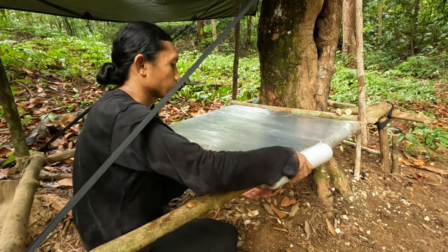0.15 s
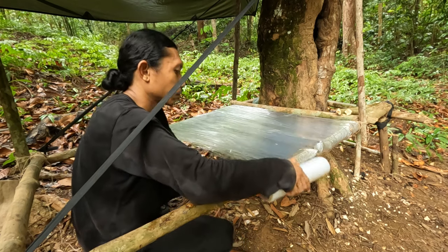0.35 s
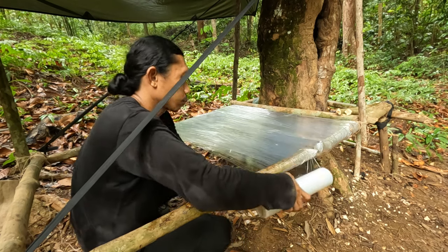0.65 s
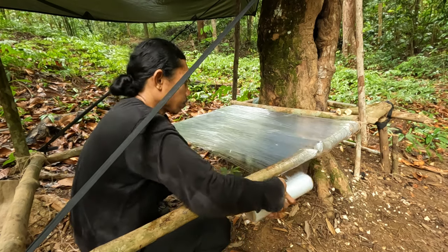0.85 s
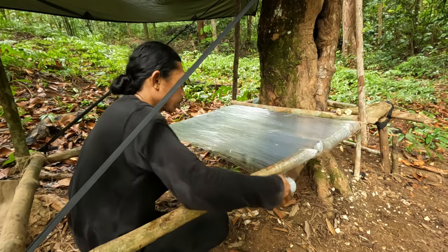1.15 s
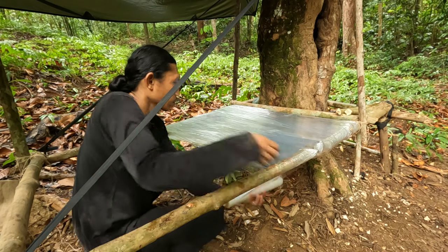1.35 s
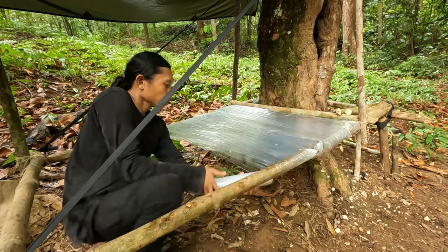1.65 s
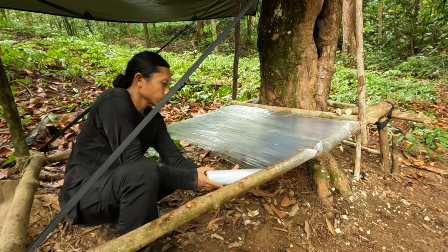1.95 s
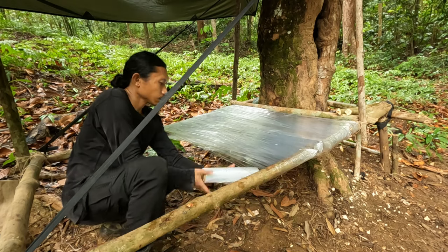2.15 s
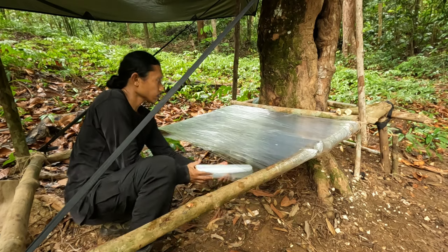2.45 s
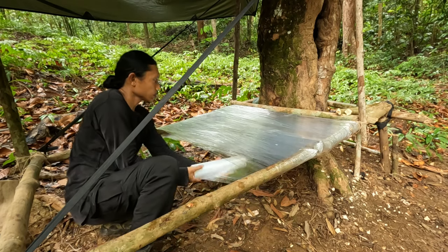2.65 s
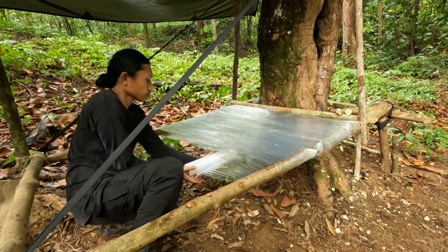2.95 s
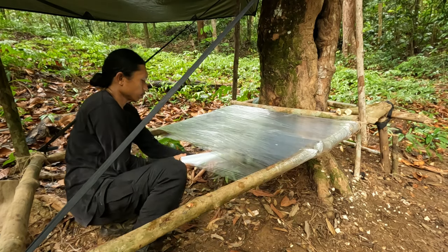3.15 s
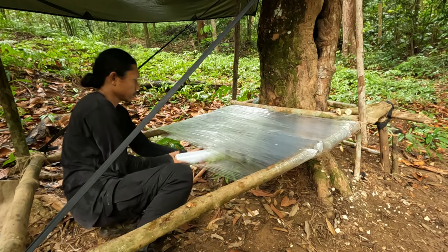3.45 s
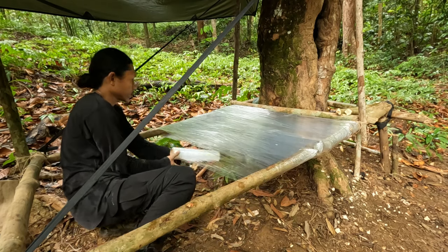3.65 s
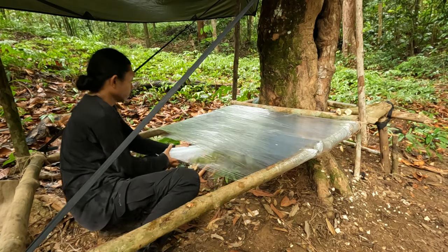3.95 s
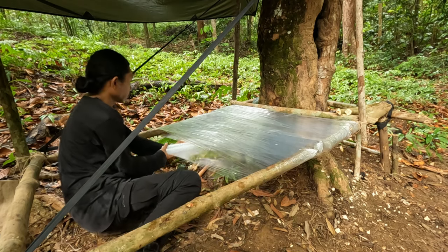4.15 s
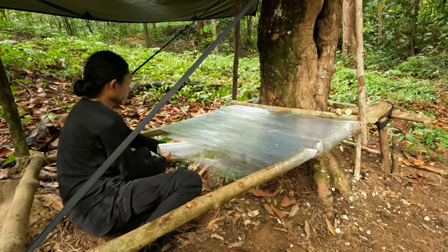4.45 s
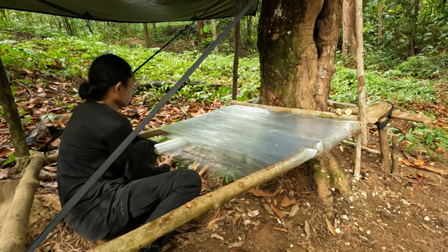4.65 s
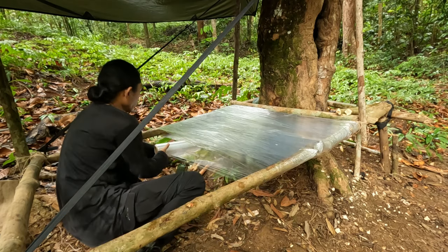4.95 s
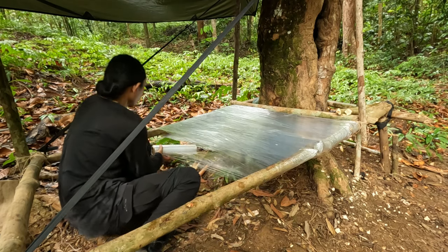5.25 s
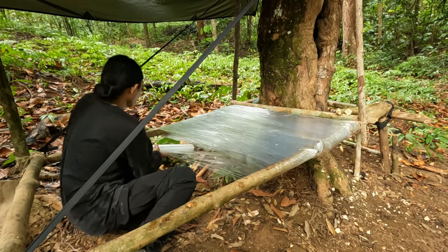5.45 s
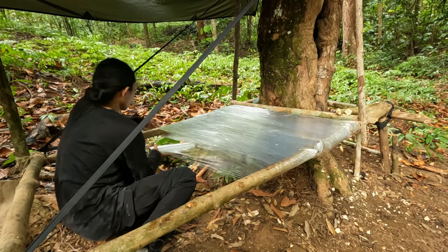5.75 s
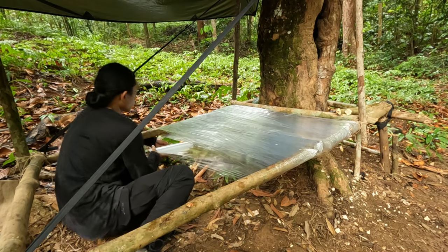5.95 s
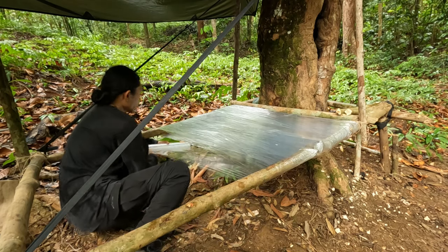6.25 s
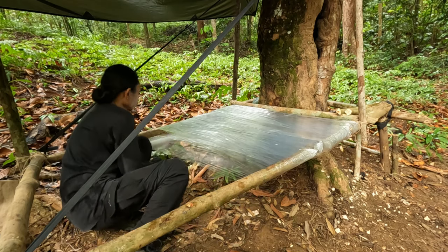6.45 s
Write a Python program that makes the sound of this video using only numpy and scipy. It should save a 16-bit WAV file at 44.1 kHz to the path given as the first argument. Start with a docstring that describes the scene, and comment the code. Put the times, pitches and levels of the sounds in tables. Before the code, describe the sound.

A close, dry stereo pickup outdoors: plastic film rustles continuously with fine crackles over faint airy hiss and weak low rumble. At 0.05 s a short rasping peel, then at 0.23-0.28 s a cluster of snaps ending in the loudest, a bright sharp crack. A small whistle at 0.46 s and light crinkles follow. At 0.75 s a low buzzy tug with a soft bump, then at 0.99 s the roll knocks a pole, short and woody. Crinkles at 1.5 s; a peel and fast upward squeak at 1.8 s. From 2.03 to 2.2 s strong zipping bursts, again at 2.55-2.65 and 2.9-3.0 s with hard snaps. Separate rasps come at 3.3, 3.6, 4.0 and 4.4 s, with clicks between. From 4.5 s mostly scattered crinkles and a dull bump at 5.4 s; faint stuttering peels from 5.9 to 6.35 s, snaps near 6.5 s, and tiny rising squeaks at 6.37 and 6.55 s.

```python
"""Stretch film in a forest camp

Stretch film is pulled off a hand-held roll and wound round a pole frame. The clinging film lets go
in stick-slip bursts: slip pulses excite resonances that buzz. Creases snap as shaped noise bursts,
the film whistles and squeaks as gliding harmonics, the roll knocks a pole (decaying modes) and bumps
the sheet (resonant noise). The sheet rustles as patchy noise with crackles over hiss and low rumble."""
import sys
import numpy as np
from scipy import signal
from scipy.fft import rfft, irfft
from scipy.io import wavfile
from scipy.ndimage import uniform_filter1d

SR = 44100
rng = np.random.default_rng(int(sys.argv[2]) if len(sys.argv) > 2 else 0)


def unload_audio(sound):
    """Save the sound as a 16-bit wav file, at the path given as the first command line argument."""
    columns = np.transpose(np.atleast_2d(sound))
    # keep every value between -1 and 1, then stretch to whole-number steps
    steps = np.round(np.clip(columns, -1, 1) * 32767)
    wavfile.write(sys.argv[1], SR, steps.astype(np.int16))


N = 290619  # samples


def gain_of(db):
    """Level definition: an amplitude ratio is 10^(dB/20)."""
    return 10 ** (np.asarray(db) / 20)


def evened(x):
    """Normalization by energy: scales all of x together to rms 1."""
    return x / np.sqrt(np.mean(x ** 2) + 1e-20)


def wandering(x, width):
    """Low-pass smoothing: two moving averages (width in samples) make noise a slow curve of rms 1."""
    return evened(uniform_filter1d(uniform_filter1d(x, width), width))


def read(points, hz):
    """Logarithmic frequency scale: interpolates a spectrum table evenly in log f."""
    f, value = np.transpose(points)
    return np.interp(np.log(hz + 1), np.log(f + 1), value)


def curves(rows, t):
    """Linear interpolation: all columns of a table after its time column, at the times t."""
    s, *columns = np.transpose(rows)
    return [np.interp(t, s, c) for c in columns]


def add(mix, s, sound):
    """Superposition: adds a sound to the mix in place from s seconds on."""
    part = mix[..., round(s * SR):][..., :sound.shape[-1]]
    part += sound[..., :part.shape[-1]]


def band(x, low_hz, high_hz):
    """Causal band-pass filtering with unit power gain for white noise."""
    sos = signal.butter(2, [low_hz, min(high_hz, SR / 2.2)], "band", fs=SR, output="sos")
    response = signal.sosfilt(sos, signal.unit_impulse(2048))
    return signal.sosfilt(sos, x) / np.linalg.norm(response)


def resonate(x, hz, width_hz):
    """Heterodyne resonance that follows the curve hz: shift to zero, smooth, shift back."""
    turn = np.exp(2j * np.pi * np.cumsum(hz * np.ones(len(x))) / SR)
    r = np.exp(-np.pi * width_hz / SR)
    smooth = signal.lfilter([np.sqrt(1 - r * r)], [1, -r], x / turn)
    return 2 * (turn * smooth).real


def noise(db):
    """Partial coherence: two partly alike channels of noise whose level field is db(hz, t)."""
    # left-right likeness: f/Hz, coherence [0-1]
    likeness = [(60, 0.48), (400, 0.94), (2400, 0.57), (8000, 0.81), (14000, 0.076)]
    frames, hz = N // 128 + 5, np.fft.rfftfreq(512, 1 / SR)
    a, b, c, d = rng.standard_normal((frames, 257, 4)).T
    same = np.clip(read(likeness, hz), -1, 1)[:, None]
    left = a + 1j * b
    right = same * left + np.sqrt(1 - same ** 2) * (c + 1j * d)
    field = gain_of(db(hz[:, None], np.arange(frames) * 128 / SR))
    return signal.istft(np.array([left, right]) * field, nperseg=512, noverlap=384)[1][:, :N]


def forest():
    """Broadband noise: a steady far hiss, with a low rumble of changing level."""
    # spectrum of the hiss: f/Hz, relative density level/dB
    air = [(12, -29), (20, -1), (49, 0), (98, -37), (181, 7.5), (317, 1.5), (775, 1), (1080, 10), (2880, 4),
           (7230, -0.5), (10100, -17), (12600, -12), (15800, -19)]
    # low rumble: t/s, level of the part common to both channels/dB
    rumble = [(0.0, -60), (0.98, -61), (1.01, -50), (1.4, -58.5), (3.21, -67.5), (5.1, -59.5), (6.59, -64)]
    hiss = gain_of(-51.5) * evened(noise(lambda hz, t: read(air, hz) + 0 * t))
    low = evened(band(band(rng.standard_normal((N, 3)).T, 26, 62), 23.4, 66))
    level_db = curves(rumble, np.arange(N) / SR)[0]
    return hiss + gain_of(level_db) * (low[0] + 0.43 * low[1:])


def rustle(patchy_db=1.9, flicker_db=2.5, crackle_db=-3., per_s=600, spread_db=4.2):
    """Friction noise: a patchy hiss of sliding film, with random crackles that ring creases."""
    # sheet and clothes moving: t/s, level/dB, brightness of the hiss at 2 kHz/dB
    motion = [(0.0, -50, 0.5), (0.59, -50.5, -0.5), (1.51, -48.5, -3), (1.72, -45.5, 0), (1.96, -45, -3.5),
              (2.31, -51, -1), (4.0, -51, -1), (4.31, -53.5, -0.5), (4.57, -47, -2.5), (6.0, -49, -1.5),
              (6.29, -50, 2), (6.59, -47.5, -2.5)]
    # spectrum of the sliding film: f/Hz, relative density level/dB
    sheet = [(71, -31), (120, -8), (147, 7.5), (289, 1.5), (1130, 1.5), (1230, 3), (5140, -1.5),
             (5810, -2.5), (12100, -19), (15800, -53)]
    # colours of the small crackles: f/Hz
    crease_hz = [900, 1970, 4500, 6800]

    def field(hz, t):
        """Fluctuating spectrum: level over frequency and time of the patchy hiss."""
        patches = uniform_filter1d(rng.standard_normal((len(t), len(hz))), 14, 0)  # along time
        patches = evened(uniform_filter1d(patches, 10, 1)).T  # along frequency
        flicker = evened(uniform_filter1d(rng.standard_normal(len(t)), 3))
        tilt_db = curves(motion, t)[1] * np.log2(1 + hz / 2000)
        return read(sheet, hz) + tilt_db + patchy_db * patches + flicker_db * flicker

    size = gain_of(spread_db * np.minimum(rng.exponential(1, N), 5))
    ticks = size * (rng.random(N) < per_s / SR) * rng.choice([-1, 1], N)
    # minimum_phase halves the dB of its input, so the spectrum enters doubled
    design_db = 2 * read(sheet, np.linspace(0, SR / 2, 257))
    colour = signal.minimum_phase(signal.firwin2(511, np.linspace(0, 1, 257), gain_of(design_db)))
    # each crackle is a short flurry that rings a small or a large crease
    sizes = np.outer(crease_hz, [.8, .93, 1.07, 1.25]).ravel()
    crease = rng.integers(0, len(sizes), N)
    flurry = rng.standard_normal((150, len(sizes))).T * np.exp(-np.arange(150) / SR / 0.00099)
    ticks = sum(signal.oaconvolve(ticks * (crease == k), band(flurry[k], f / 2, f * 2))[:N]
                for k, f in enumerate(sizes))
    # the crackles wander between left and right
    side = gain_of(5.4 * evened(uniform_filter1d(rng.standard_normal(N), 400)))
    crackle = signal.oaconvolve(np.array([ticks * side, ticks / side]), colour[None])[:, :N]
    level_db = curves(motion, np.arange(N) / SR)[0]
    return gain_of(level_db) * (evened(noise(field)) + gain_of(crackle_db) * evened(crackle))


def tug(t, rise_s, length_s, peak_db):
    """Stick-slip envelope in dB: breaks in below the peak, swells, sags with the pull, dies quickly."""
    break_s, break_db = 0.001, -9.5
    sag_db_per_s, release_db_per_s = -250, -1200
    swell = break_db * np.maximum(1 - t / rise_s, 0)
    sag = sag_db_per_s * np.maximum(t - rise_s, 0)
    release = release_db_per_s * np.maximum(t - length_s, 0)
    onset = 20 * np.log10(np.minimum(t / break_s, 1) + 1e-4)
    return peak_db + swell + sag + release + onset


def peel(rise_s, length_s, peak_db, first_hz, last_hz, uneven, drum_db, fizz_db, brighten_db,
         drift=0.45, stray_hz=2500., patch_db=-7.5, patch_width_hz=300.0, stutter_db=1.6, shake=.012):
    """Stick-slip: the peel line jumps at the slip rate; uneven pulls wander and add stray slips."""
    # bands that a slip rings, for peel line, drumming sheet, fizz: low f/Hz, high f/Hz
    slip_hz = [(1300, 6700), (300, 1090), (5060, 8400)]
    # middle pitches of the freed patches: f/Hz
    patch_hz = [2090, 3340, 4360, 7250]
    t = np.arange(0, .12, 1 / SR)
    settle_s = .012  # time constant of the slip rate
    hz = last_hz + (first_hz - last_hz) * np.exp(-t / settle_s)
    tilt_db = brighten_db * (np.minimum(t / length_s, 1) - .5)
    drum_db, fizz_db = drum_db - tilt_db, fizz_db + tilt_db
    uneven = np.clip(uneven, 0, 1)
    wander, sign, grip, *stretch = rng.standard_normal((len(t), 7)).T
    # the cling varies along the roll
    db = tug(t, rise_s, length_s, peak_db) + stutter_db * wandering(grip, 120)
    jitter = (shake + drift * uneven ** 2) * evened(uniform_filter1d(wander, 60))
    turns = np.cumsum(hz * np.exp(jitter)) / SR
    slips = -1. * (np.diff(np.floor(turns), prepend=0) > 0)  # one pulse a cycle
    strays = np.sign(sign) * (rng.random(len(t)) < stray_hz * uneven ** 2 / SR)
    # divided by the root of the pulse rate, to keep the power alike at any rate
    train = (slips + uneven * strays) * gain_of(db) / np.sqrt((hz + stray_hz * uneven ** 4) / SR)
    line, drum, fizz = (band(train * gain_of(g), *edges)
                        for g, edges in zip([0, drum_db, fizz_db], slip_hz))
    # freed patches of film ring at pitches that wander as their tension changes
    tensions = [wandering(v, 400) for v in stretch]
    shares_db = [0, 0, fizz_db / 2, fizz_db]
    patches = sum(resonate(train * gain_of(g), f * np.exp(0.2 * w), patch_width_hz)
                  for f, g, w in zip(patch_hz, shares_db, tensions))
    return line - drum + fizz + gain_of(patch_db) * patches


def snap(db, hz, pan_db, crack_s=.0009, after_s=.006, after_db=-17, ring_db=-2., flap_db=-8.):
    """Impulsive buckling: a wide crack, a ring at the crease's size, a low flap and after-crackles."""
    t = np.arange(1500) / SR
    crack, after = rng.standard_normal((len(t), 2)).T
    kick = 2.06 * signal.unit_impulse(len(t)) + np.exp(-t / crack_s) * crack
    kick = kick + gain_of(after_db) * np.exp(-t / after_s) * after ** 3 / 2  # the cube makes it spiky
    ring = band(kick, hz / 1.89, hz * 1.17)
    ring = gain_of(ring_db) * min(1, np.sqrt(hz / 1500)) * ring  # large creases ring less
    flap = gain_of(flap_db) * band(kick, 214, 940)
    wave = band(kick, 670, 4650) + ring + flap
    return gain_of(db) * wave / abs(wave).max() * gain_of([[pan_db / 2], [-pan_db / 2]])


def squeak(length_s, db, first_hz, last_hz):
    """Harmonic series on a gliding fundamental: a wavering, grainy whistle or squeak that fades."""
    # levels of the harmonics from the fundamental up: level/dB
    overtones_db = [0, -10, -19]
    rise_s, fade_db_per_s = 0.0015, -3000
    t = np.arange(0, .04, 1 / SR)
    hz = first_hz + (last_hz - first_hz) * np.minimum(t / length_s, 1)
    db = db + fade_db_per_s * np.maximum(t - length_s, 0)
    waver, grain = (evened(uniform_filter1d(v, 40)) for v in rng.standard_normal((len(t), 2)).T)
    turns = np.cumsum(hz * (1 + .007 * waver)) / SR
    # harmonics sound only below 12 kHz
    tone = sum(gain_of(g) * np.sin(2 * np.pi * k * turns) * (k * hz < 12000)
               for k, g in enumerate(overtones_db, 1))
    return np.minimum(t / rise_s, 1) * gain_of(db + 2 * grain) * tone


def bump(db, start_hz, end_hz, s):
    """Falling tension: a dull puff of resonant noise whose pitch sags as the sheet slackens."""
    u = np.linspace(0, 1, round(s * SR))
    puff = resonate(rng.standard_normal(len(u)), start_hz + (end_hz - start_hz) * u, 136.0)
    return gain_of(db) * np.sin(np.pi * u ** 0.56) ** 2 * puff


def knock(db, lag=0.0236):
    """Modal decay and dispersion: roll and pole ring in modes; bending waves bring the treble first."""
    # modes of roll and pole: f/Hz, level/dB, t60/s
    pole = [(42, -21, 0.67), (86, -13, 0.22), (205, 6.5, 0.018), (315, 5.5, 0.031), (650, 11.5, 0.0086),
            (1250, 4.5, 0.011), (2390, 7.5, 0.0032)]
    t = np.arange(SR // 2) / SR
    ringing = 0
    for hz, mode_db, t60 in pole:
        since = np.maximum(t - lag / np.sqrt(hz), 0)  # time since this mode's arrival
        ringing = ringing + gain_of(mode_db - 60 * since / t60) * np.sin(2 * np.pi * hz * since)
    return gain_of(db) * ringing


def clearing(x, t60=0.071):
    """Diffuse scattering off tarp, trunk and leaves: short, mostly treble, other for each channel."""
    t = np.arange(SR // 6) / SR
    taps = band(rng.standard_normal((len(t), 2)).T, 2400, 24000) * gain_of(-60 * t / t60)
    return signal.oaconvolve(x, taps / np.linalg.norm(taps[0]), axes=1)[:, :N]


def scene():
    """Superposition of film, roll and rustle at arm's length, with the clearing's scatter."""
    # event levels are those ahead of the treble colouring
    # tugs: start t/s, rise t/s, time to release t/s, level/dB, first f/Hz, settled f/Hz, unevenness [0-1],
    # drumming level/dB, fizz level/dB, brightening over the tug/dB
    peels = [(.047, 0.008, 0.036, -29.5, 945, 803, 0.82, -35, -22, -8),
             (.242, 0.023, 0.046, -36.5, 598, 708, 0.83, -5, -2, 0),
             (0.751, 0.014, 0.026, -39.5, 1300, 1192, 0.49, 7.5, 5, -13),
             (0.7719, 0.0064, 0.024, -32.5, 242.6, 210.8, 0.36, 5.5, -7, -3.5),
             (1.768, 0.01, 0.026, -43, 950, 1002, 0.91, 7, -8, 0),
             (1.799, 0.0053, 0.018, -33, 1055, 850, 0.67, -8, -3, 24.5),
             (2.033, 0.024, 0.032, -24.5, 713.5, 900, 0.47, -1, -15, 10),
             (2.065, 0.0054, 0.015, -27.5, 1204, 1420, 0.36, 5.5, -5, 3),
             (2.081, .003, 0.0096, -41.5, 992, 900, .3, 7, -8, 10),
             (2.107, 0.0068, 0.048, -25, 601, 1673, .32, 1.5, -9, -4),
             (2.169, 0.009, 0.034, -36.5, 843, 1378, 0.35, -24, -2.5, -9),
             (2.542, 0.019, 0.046, -30, 483.5, 682, 0.57, -13.5, -21, -10),
             (2.576, 0.0065, .021, -27.5, 695, 684, 0.48, -3, -18, -4),
             (2.621, 0.0024, 0.011, -32, 1542, 1394, .45, 3, -24, -2),
             (2.633, 0.0084, .026, -32, 1150, 959, 0.56, -4, -30, 3),
             (2.921, 0.01, 0.032, -35, 988, 807, 0.76, -3.5, -20, -12),
             (2.978, 0.019, .024, -25.5, 948, 993, 0.47, -4.5, -23, -8),
             (3.002, 0.0076, 0.0091, -24, 1098, 1335, .25, -8, -36, -13),
             (3.315, 0.034, 0.038, -31, 946, 1464, 0.62, -5, -9, 6),
             (3.589, 0.026, 0.068, -31.5, 900, 1300, .65, -13, 1.5, 1),
             (3.665, 0.0052, .025, -47, 1010, 775, .8, 6.5, -10, -4),
             (4.02, 0.017, 0.043, -28, 780.6, 959, 0.64, -29, -13, -22),
             (4.368, 0.012, 0.052, -37.5, 806, 661, 0.68, -1.5, -2, -11),
             (5.18, 0.013, 0.026, -47.5, 1060, 910, 0.77, 10.5, -39, 2),
             (5.3, 0.0045, 0.022, -48.5, 900, 900, 0.84, -2, -1, -5),
             (5.916, 0.0063, 0.016, -50, 900, 900, 0.83, 6, -10, 0),
             (6.082, .004, .01, -49, 900, 900, .8, -6, -6, 0),
             (6.126, 0.0092, 0.023, -49, 900, 900, 0.7, -5, 3, -2),
             (6.203, 0.0081, 0.012, -47.5, 900, 900, 0.6, 10.5, 6, -2),
             (6.278, 0.0047, 0.01, -49, 900, 814, 0.68, 6, -6, -4),
             (6.297, 0.0057, 0.01, -41, 788, 777, 0.9, 0, 1, 0),
             (6.316, .003, 0.0066, -54, 790, 805, 0.81, -8, 5, 0),
             (6.335, 0.0047, 0.01, -45.5, 650, 627, 0.61, 6, -1, -10)]
    # slips returned by frame and ground: delay t/s, level/dB
    slip_echoes = [(.002, -15.5), (.004, -19)]
    # creases snapping: t/s, peak level/dB, ring f/Hz, left over right level/dB
    snaps = [(0.232, -22, 2440, 8), (0.248, -16, 3700, -4), (0.257, -17, 2930, -4), (0.268, -15, 3180, 0),
             (0.274, -5.5, 4500, -2.0), (0.512, -21.5, 1460, 3), (0.551, -25, 5000, 0),
             (0.564, -30, 6500, 0), (0.593, -28, 1110, 5), (0.891, -22, 3540, 1), (0.993, -18.5, 423, 14.5),
             (1.501, -27.5, 1470, 14), (1.538, -19.5, 1530, 2), (1.581, -20, 1250, -0.5),
             (1.779, -22, 1150, 0.0), (1.971, -28, 6000, 0), (1.988, -25, 700, 0), (2.002, -24, 900, 2),
             (2.262, -29.5, 3500, 4), (2.342, -21, 6100, -3), (2.491, -21.5, 5800, -1),
             (2.611, -12, 1380, 4), (2.722, -43, 1500, 2), (2.796, -28, 6600, 2), (2.831, -23, 3940, -0.5),
             (2.846, -28, 1300, 0), (2.938, -10.5, 2780, 3), (3.732, -25.5, 1500, 3), (3.752, -30, 2500, 0),
             (3.765, -19, 1840, 0), (3.817, -19.5, 1150, 7), (3.844, -26.5, 5160, -10),
             (3.868, -14.5, 3300, 7.5), (3.907, -23, 1410, 0.0), (4.086, -24, 3000, 0),
             (4.119, -29.5, 2000, 0), (4.394, -15.5, 5800, 0.5), (4.495, -26.5, 2500, 3),
             (4.578, -38, 800, 0), (4.613, -27, 1300, -2), (4.646, -18.5, 894, 2), (4.748, -17, 4070, 0),
             (4.843, -34, 1140, -1), (4.889, -20, 5060, -3), (4.902, -28, 6500, 0), (4.94, -17.5, 1430, -1),
             (5.186, -21, 1510, 2), (5.203, -25, 1500, -2), (5.288, -23, 2090, 2), (5.305, -29, 5000, 0),
             (5.393, -21, 3300, 3), (5.449, -22.5, 775, 0.5), (5.5, -16.5, 5550, 1),
             (5.705, -16.5, 1330, 0.5), (6.032, -23, 3700, 1), (6.278, -25, 620, 0.5),
             (6.479, -34, 3000, 0), (6.488, -16.5, 610, 1), (6.492, -18, 2500, 0)]
    # gliding whistles and squeaks of the film: start t/s, time to fade t/s, level/dB, first f/Hz, last f/Hz
    squeaks = [(.462, 0.016, -27, 2570, 2496), (1.807, .02, -26.5, 2500, 9040),
               (2.9, 0.0091, -33.5, 3300, 3040), (2.911, 0.0074, -34, 2430, 2480),
               (6.37, 0.0092, -27, 5300, 8970), (6.55, 0.0132, -30, 5030, 7100)]
    # hands and roll bumping the sheet: t/s, level/dB, start f/Hz, end f/Hz, length t/s
    bumps = [(0.765, -38, 420, 170, 0.061), (2.62, -36.5, 290, 170, 0.079), (0.99, -36, 730, 300, 0.011),
             (5.425, -41.5, 330, 70, 0.075), (6.9, -48, 610, 260, 0.09)]
    # blow and bounce of the roll: t/s, level/dB
    knocks = [(.9931, -17), (0.9984, -31)]
    # treble colour of the near sounds, as picked up, held flat beyond the ends: f/Hz, gain level/dB
    near_colour = [(8500, -4), (10000, -11.5), (12500, -3), (14000, -8), (15500, -14)]
    film, near = np.zeros(N), np.zeros((2, N))
    for s, *row in peels:
        add(film, s, peel(*row))
    direct = film.copy()
    for s, db in slip_echoes:
        add(film, s, gain_of(db) * direct)
    for s, *row in snaps:
        add(near, s, snap(*row))
    for s, *row in squeaks:
        add(film, s, squeak(*row))
    for s, *row in bumps:
        add(film, s, bump(*row))
    for s, db in knocks:
        add(film, s, knock(db))
    colour_gain = gain_of(read(near_colour, np.fft.rfftfreq(N, 1 / SR)))
    near = irfft(rfft(near + film) * colour_gain, N)
    return near + gain_of(-5.5) * clearing(near) + rustle() + forest()


def record(dry):
    """Interchannel differences: left has more treble, the highest a little later; then a band limit."""
    # left port over right: f/Hz, level/dB, phase lead [rad]
    lean = [(5000, 0, 0), (9000, 2.5, 0), (11500, 3, -.4), (13600, 3, -2.2), (15200, 3, -7)]
    hz, half = np.fft.rfftfreq(N, 1 / SR), np.array([[.5], [-.5]])
    db, lead = (read([(row[0], row[k]) for row in lean], hz) for k in (1, 2))
    leaned = irfft(rfft(dry) * gain_of(db * half) * np.exp(1j * lead * half), N)
    edge_hz = 15900
    low_pass = signal.firwin(511, edge_hz, window=("kaiser", 9), fs=SR)
    return signal.oaconvolve(leaned, low_pass[None], "same")


dry = scene()
out = record(dry)
unload_audio(out)
```